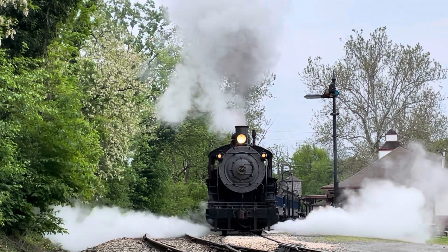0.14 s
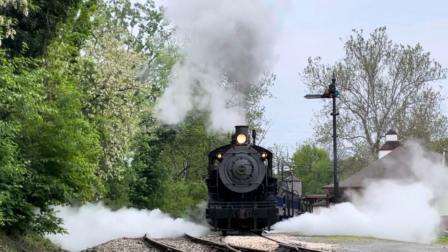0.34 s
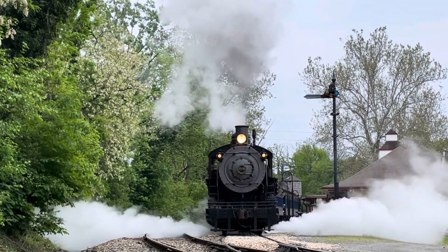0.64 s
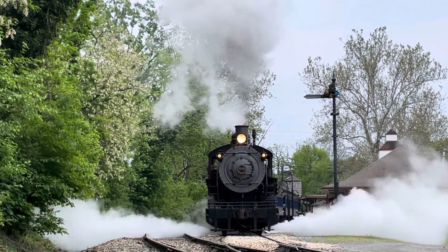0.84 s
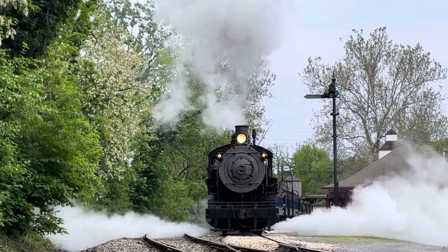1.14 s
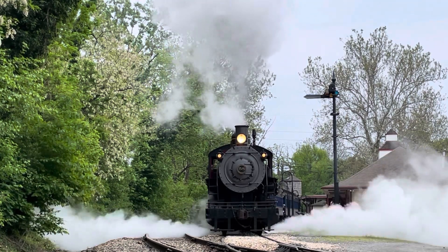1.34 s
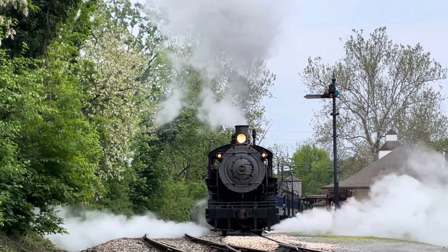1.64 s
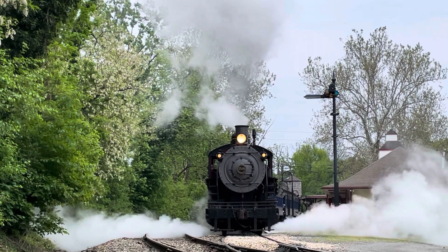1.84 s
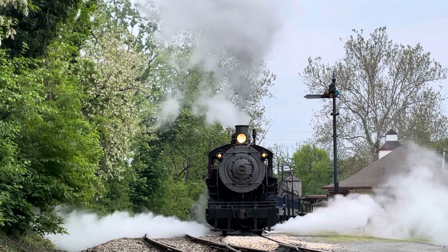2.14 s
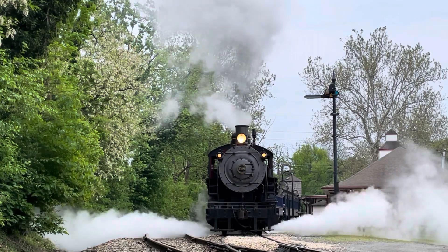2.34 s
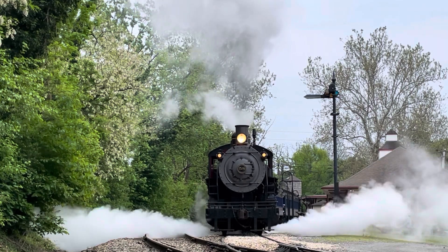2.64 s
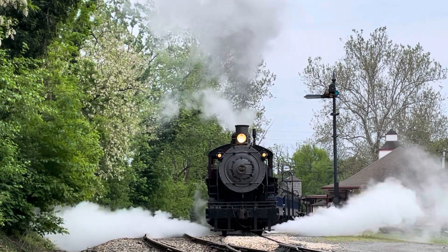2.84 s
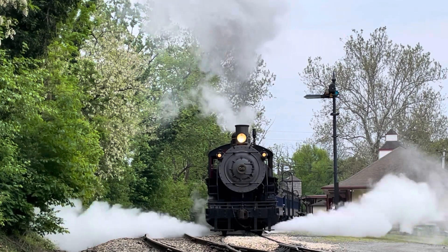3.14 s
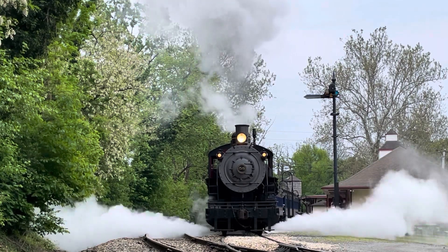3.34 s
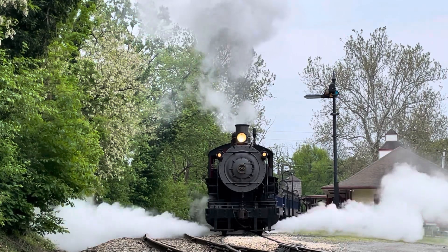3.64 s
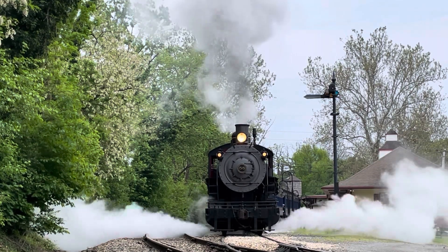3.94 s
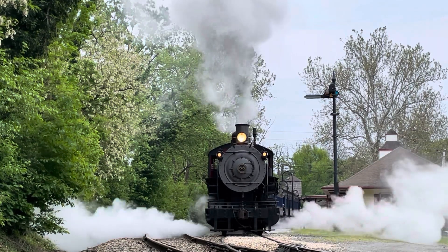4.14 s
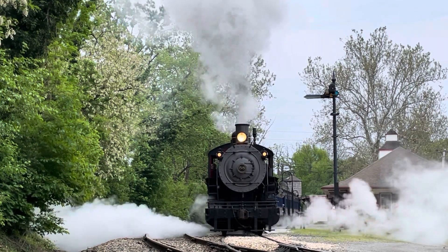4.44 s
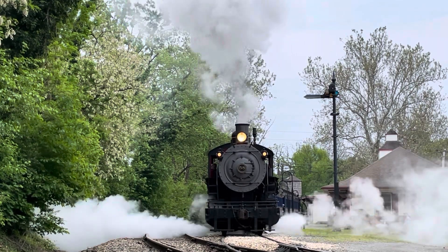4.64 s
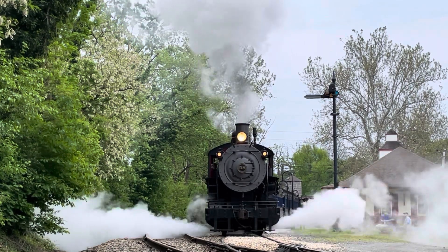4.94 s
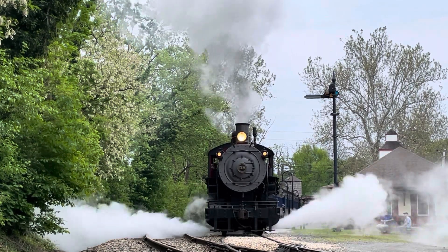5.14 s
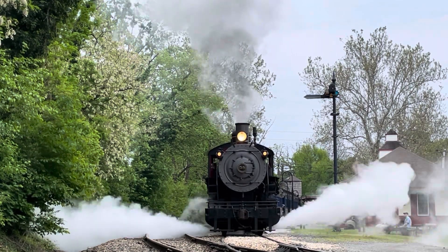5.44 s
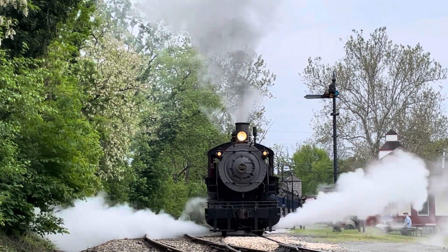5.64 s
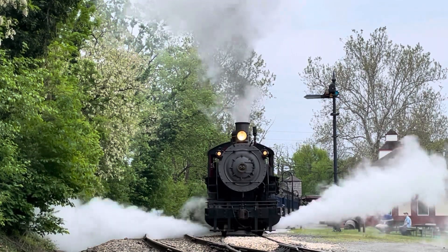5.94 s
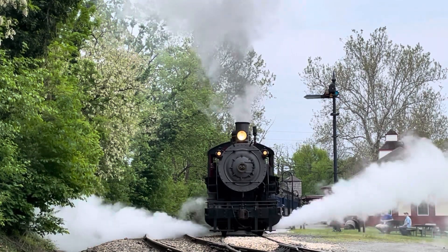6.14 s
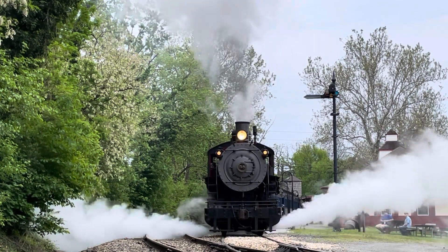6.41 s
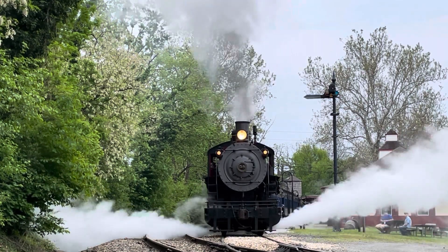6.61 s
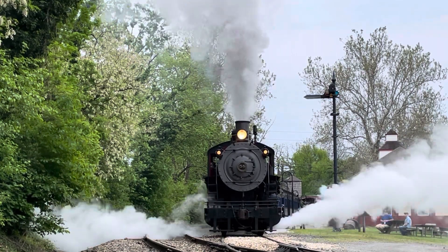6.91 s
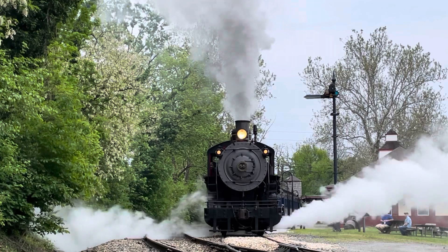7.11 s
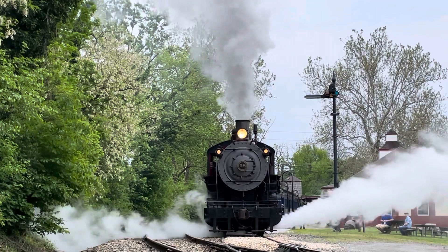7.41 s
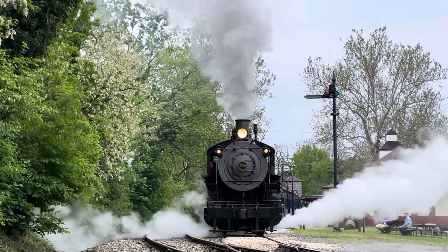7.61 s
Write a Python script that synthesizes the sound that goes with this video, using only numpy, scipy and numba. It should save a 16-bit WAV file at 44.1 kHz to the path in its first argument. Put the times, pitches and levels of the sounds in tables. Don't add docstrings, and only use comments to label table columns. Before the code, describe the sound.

Outdoors at a country station, a steam locomotive creeps towards a hand-held stereo recorder. Broad white hiss from its open cylinder valves dominates, swelling early, dipping, then holding strong through the middle before weakening. Beneath it, irregular low gulps of exhaust rumble and boom. A faint bell tolls about once a second, while short hollow honks and thin gland whistles poke through the first half. Deep stack notes come late.

```python
import sys
import numpy as np
from scipy import signal
from scipy.fft import rfft, irfft, next_fast_len
from scipy.io import wavfile
from scipy.ndimage import uniform_filter1d
from numba import njit

SR = 44100
rng = np.random.default_rng(int(sys.argv[2]) if len(sys.argv) > 2 else 0)


def voltage_ratio(decibels):
    exponent = np.asarray(decibels, float) / 20
    return 10 ** exponent


def waveform_to_disk(signal):
    frames = np.transpose(np.atleast_2d(signal))
    scaled = np.clip(frames, -1, 1) * 32767
    samples = np.round(scaled).astype(np.int16)
    wavfile.write(sys.argv[1], SR, samples)


N = 342657
SIZE = next_fast_len(N)
HZ = np.maximum(np.arange(SIZE // 2 + 1) * SR / SIZE, 1)


def rms_one(x):
    return x / np.sqrt(np.mean(x ** 2) + 1e-20)


def in_time(rows):
    s, *columns = np.transpose(rows)
    return [np.interp(np.arange(N) / SR, s, column) for column in columns]


def at_hz(points, hz):
    point_hz, value = np.transpose(points)
    return np.interp(np.log(hz), np.log(point_hz), value)


def drift(rate_hz):
    spacing = 40
    settling = 2000
    pole = np.exp(-2 * np.pi * rate_hz * spacing / SR)
    draws = rng.standard_normal(N // spacing + settling + 2)
    slow = signal.lfilter([1], [1, -2 * pole, pole ** 2], draws)[settling:]
    return np.interp(np.arange(N) / spacing, np.arange(len(slow)), rms_one(slow))


def swell(start_s, hold_s, top_db, rise_db_s, fall_db_s):
    late_s = np.arange(N)[:, None] / SR - start_s
    below_db = np.maximum(-late_s * rise_db_s, (late_s - hold_s) * fall_db_s)
    return np.max(top_db - np.maximum(below_db, 0), axis=1)


def hump(hz, width_hz):
    return 1 / (1 + ((HZ - hz ** 2 / HZ) / width_hz) ** 2)


# frequency in Hz, likeness from 0 to 1.
PORT_LIKENESS = [(60, 0.978), (300, 0.96), (900, 0.85), (1500, 0.92), (1950, 0.7), (3000, .9), (3900, .85),
                 (4700, .95), (6500, .85), (8500, .93), (9600, .8), (10700, 0.88), (11800, .88),
                 (12750, 0.9), (14800, .9), (15600, .82)]


def stereo_white():
    alike = np.clip(at_hz(PORT_LIKENESS, HZ), 0, 1)
    real, imaginary = rng.standard_normal((2, 2, len(HZ)))
    mid, side = real + 1j * imaginary
    return np.sqrt(1 + alike) * mid + np.sqrt(1 - alike) * side * [[1], [-1]]


def hollow(modes):
    power = sum(voltage_ratio(db) ** 2 * hump(hz, width_hz) ** 2 for hz, width_hz, db in modes)
    return rms_one(irfft(stereo_white() * np.sqrt(power), SIZE)[:, :N])


JET_PARTS_HZ = [500, 1500, 3900, 8000]
# frequency in Hz, spectral density in dB per Hz.
JET_COLOUR = [(120, -40), (260, -16), (400, -16), (900, -13), (1300, -9), (2000, -3.5), (3200, -0.5),
              (5300, -0.5), (6500, 0), (9200, -3), (10300, -6.5), (12000, -11.5), (13800, -15),
              (15500, -11.5)]
# frequency in Hz, width in Hz, level in dB.
NOZZLES = [(1293, 79, 8.5), (1680, 37, 6.5), (1820, 27, 2), (2950, 37, 2.5), (4090, 30, 3),
           (5330, 480, 2.5)]
# time in seconds, level in dB.
PRESSURE = [(0.0, -31), (0.34, -23), (0.76, -31), (1.13, -31), (1.25, -33.5), (2.12, -29), (2.21, -24.5),
            (3.35, -24), (3.76, -26), (4.46, -25), (4.67, -27.5), (4.78, -24), (5.32, -26), (5.39, -25),
            (5.97, -24), (6.25, -28), (7.57, -29.5), (7.77, -31)]
# time in seconds, brightening in dB.
AIM = [(0, -1.5), (.3, -1), (.8, -1), (1.4, -6.5), (2.0, -2.5), (2.4, 0), (2.8, -0.5), (3.5, -1),
       (4.0, 0.5), (4.6, 0.1), (5.2, -1), (5.8, 2.5), (6.2, 2), (6.8, 4.5), (7.77, 2.5)]
PART_PER_PRESSURE = [-0.72, -0.19, 0.04, -0.0033]
PART_PER_AIM = [0.36, -.2, -0.14, 0.92]
PART_PER_S = [-.2, -0.72, 0.079, 0.11]
PART_PER_BOOM = [0.43, 0, 0.032, 0.14]


def jets(gust_db, eddy_db, patch_db):
    valve_lag_s = .08
    (hiss_db,), (aim_db,) = in_time(PRESSURE), in_time(AIM)
    hiss_db = uniform_filter1d(hiss_db, int(valve_lag_s * SR), mode="nearest")
    _, boom_db = exhaust()
    causes = np.array([hiss_db, aim_db, np.arange(N) / SR, boom_db])
    laws = np.transpose([PART_PER_PRESSURE, PART_PER_AIM, PART_PER_S, PART_PER_BOOM])
    shifts_db = laws @ (causes - causes.mean(axis=1, keepdims=True))

    edge_tones_db = sum(db * hump(hz, width_hz) for hz, width_hz, db in NOZZLES)
    colour_db = at_hz(JET_COLOUR, HZ) + edge_tones_db
    noise = stereo_white() * voltage_ratio(colour_db) * np.sqrt(hump(2850, 12600))
    hiss_band = (HZ > 2800) & (HZ < 5400)
    noise = noise / (np.linalg.norm(noise[:, hiss_band]) / SIZE)

    centres_hz = np.geomspace(250, 15000, 11)
    place = np.interp(np.log(HZ), np.log(centres_hz), np.arange(len(centres_hz)))
    billow_db = gust_db * drift(4.2) + eddy_db * drift(28.0)
    out = 0
    for k, hz in enumerate(centres_hz):
        slope = np.cos(np.pi / 2 * np.clip(place - k, -1, 1)) ** 2
        part = np.interp(np.log(hz), np.log(JET_PARTS_HZ), np.arange(4))
        low = min(int(part), 2)
        shift_db = shifts_db[low] + (part - low) * (shifts_db[low + 1] - shifts_db[low])
        thin = .25 * max(np.log2(hz / 9000), 0)
        thin_db = thin * (hiss_db - hiss_db.mean())
        unsteady = (hz / 8000) ** 0.54
        flicker_db = unsteady * billow_db + patch_db * drift(8.2)
        out = out + voltage_ratio(shift_db + thin_db + flicker_db) * irfft(noise * slope, SIZE)[:, :N]
    return voltage_ratio(hiss_db - 0.16) * out


@njit
def add(out, x, lag, gain):
    for i in range(x.shape[1]):
        then = abs(i - lag[i])
        whole = int(then)
        for c in range(2):
            out[c, i] += gain * (x[c, whole] + (then - whole) * (x[c, whole + 1] - x[c, whole]))


# delay in seconds, level in dB.
BOUNCES = [(.0011, -27), (.0018, -18.5), (.0037, -23.5), (.0044, -17), (.0058, -19.5), (.0072, -17),
           (.0095, -22), (0.0143, -15), (.029, -19)]


def bounced(x, creep_s):
    out = x.copy()
    for delay_s, db in BOUNCES:
        add(out, x, (delay_s + creep_s * drift(.15)) * SR, float(voltage_ratio(db)))
    return out


# start in seconds, hold in seconds, level in dB.
GLAND_SONGS = [
    (.3, .1, -62),
    (.72, .05, -60),
    (1.3, .8, -64),
    (2.8, 0.26, -57.5),
    (3.5, 0.39, -57),
]
# start in seconds, hold in seconds, level in dB.
HONKS = [
    (.12, 0.17, -40),
    (1.2, .05, -46),
    (2.4, .08, -40),
    (3.3, .05, -51),
    (4.0, .1, -44),
]
# frequency in Hz, width in Hz, level in dB.
THROAT = [(1452, 82, 0)]


def leaks():
    gland_db = swell(*np.transpose(GLAND_SONGS), rise_db_s=23, fall_db_s=25)
    throat_db = swell(*np.transpose(HONKS), rise_db_s=20, fall_db_s=4.5)
    gland_hz = 742 + 4.56 * drift(4.75)
    whistle = np.sin(2 * np.pi * np.cumsum(gland_hz) / SR)
    waver_db = 3.3 * drift(10.0)
    return voltage_ratio(gland_db + 4.0 + waver_db) * whistle + voltage_ratio(throat_db) * hollow(THROAT)


# start in seconds, hold in seconds, firebox rumble in dB,
# smokebox boom in dB.
GULPS = [(.24, .03, -49.5, -48.5), (.56, .05, -50, -47), (.97, .06, -49.5, -51.5), (1.47, .03, -50.5, -52),
         (1.797, 0.037, -50.5, -48.5), (2.14, .2, -49.5, -51), (2.397, 0.33, -49.5, -46.5),
         (2.97, .02, -50.5, -49), (3.328, .03, -48.5, -50), (3.7, .15, -48, -53), (3.92, 0.11, -46.5, -51),
         (4.28, .02, -52, -58), (4.707, 0.055, -50, -50), (5.128, .02, -53, -51), (5.37, 0.37, -55.5, -52),
         (6.04, .08, -57, -51.5), (6.5, .05, -54.5, -54.5), (6.77, .05, -53, -53.5), (7.18, .03, -57, -55),
         (7.55, .05, -53, -50)]


def exhaust():
    s, hold_s, fire_db, box_db = np.transpose(GULPS)
    rumble_db = swell(s, hold_s, fire_db, rise_db_s=45, fall_db_s=40)
    boom_db = swell(s, hold_s, box_db, rise_db_s=22, fall_db_s=22)
    return rumble_db, boom_db


# frequency in Hz, width in Hz, level in dB.
FIREBOX = [(64.7, 38, 3), (98, 42, -1.5), (45, 30, -10), (125, 35, -7)]
# frequency in Hz, width in Hz, level in dB.
SMOKEBOX = [(236, 170, 1), (148, 92, -0.5), (182, 83, -4.5)]
# frequency in Hz, width in Hz, level in dB.
STACK = [(182.6, 25, 0)]
# start in seconds, hold in seconds, level in dB.
STACK_NOTES = [
    (4.72, .3, -62),
    (5.45, 0.34, -54),
    (6.7, .9, -58),
]


def draught():
    rumble_db, boom_db = exhaust()
    note_db = swell(*np.transpose(STACK_NOTES), rise_db_s=60, fall_db_s=9)
    rumble = voltage_ratio(rumble_db + 0.5) * hollow(FIREBOX)
    boom = voltage_ratio(boom_db - 2.5) * hollow(SMOKEBOX)
    return rumble + boom + voltage_ratio(note_db) * hollow(STACK)


# time in seconds, level in dB.
STROKES = [(.02, -67), (.93, -50), (1.58, -60), (1.95, -52.5), (2.82, -59), (3.66, -59), (4.62, -63),
           (5.78, -56), (6.6, -61), (7.48, -66)]
BELL_HZ = [559, 742, 938, 1297, 1588, 1886, 2298]
# level in dB, 60 dB decay time in seconds.
BELL = [(-12, 1.3), (-9, 1.7), (5.5, 3.4), (2, 1.3), (-6, .8), (10, 2.4), (19.5, 0.67)]


def bell():
    s, stroke_db = np.transpose(STROKES)
    spread_db = 0.74 * rng.standard_normal((len(s), len(BELL)))
    out = np.zeros(N)
    for k, (hz, (db, t60_s)) in enumerate(zip(BELL_HZ, BELL)):
        clicks = np.full(N, 1e-18)
        clicks[(s * SR).astype(int)] = voltage_ratio(stroke_db + db + spread_db[:, k])
        decay = voltage_ratio(-60 / (t60_s * SR))
        turn = 2 * np.pi * hz / SR
        out += signal.lfilter([0, np.sin(turn)], [1, -2 * decay * np.cos(turn), decay ** 2], clicks)
    return out


def scene():
    steam = bounced(jets(gust_db=0.34, eddy_db=.5, patch_db=0.73), creep_s=1.1e-4)
    return steam + leaks() + bell() + draught()


# frequency in Hz, lead of the left in radians.
PORT_PHASE = [(10, 0), (1200, .2), (1550, 1.8), (1950, .7), (2350, 1.), (3000, .25), (5100, .1),
              (6300, 1.4), (7050, .85), (8000, 2.55), (8750, 3.45), (10600, 6.28), (11500, 6.8),
              (12300, 9.2), (13500, 10.0), (14100, 11.9), (14700, 12.55), (15700, 13.3)]
# frequency in Hz, left minus right in dB.
PORT_BALANCE = [(100, -0.5), (1100, -0.5), (1300, 0.5), (1650, -2), (2400, 0.5), (3200, 0.2)]


def ports(dry):
    cutoff_hz = 15750
    hz, lead_rad = np.transpose(PORT_PHASE)
    half = np.exp(.5j * np.interp(HZ, hz, lead_rad)) * voltage_ratio(at_hz(PORT_BALANCE, HZ) / 2)
    spectra = rfft(dry, SIZE) * np.array([half, 1 / half]) * (HZ < cutoff_hz)
    return irfft(spectra, SIZE)[:, :N]


def top_cut(x):
    return signal.sosfilt(signal.butter(12, 17060, fs=SR, output="sos"), x)


def record(dry):
    mix = ports(dry)
    return top_cut(mix)


dry = scene()
out = record(dry)
waveform_to_disk(out)
```